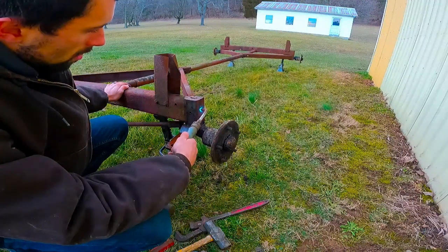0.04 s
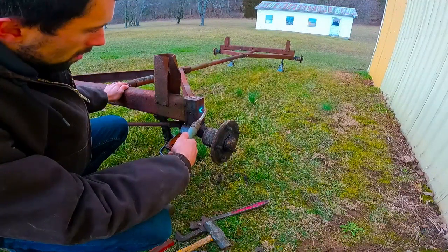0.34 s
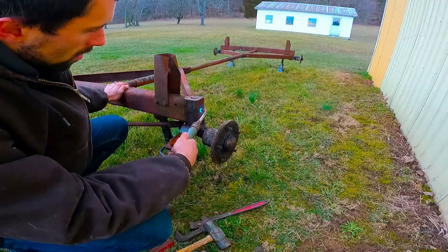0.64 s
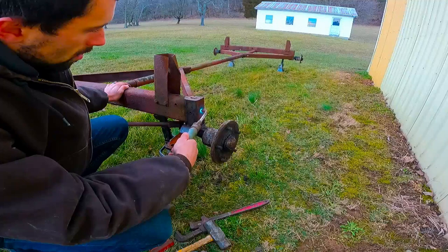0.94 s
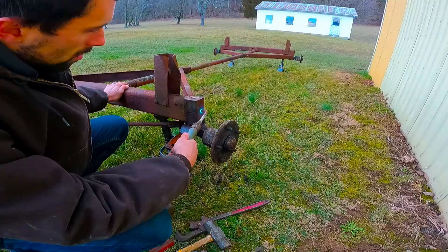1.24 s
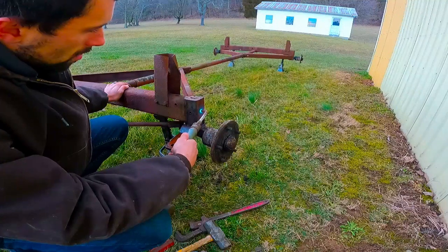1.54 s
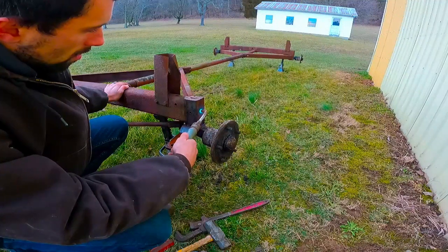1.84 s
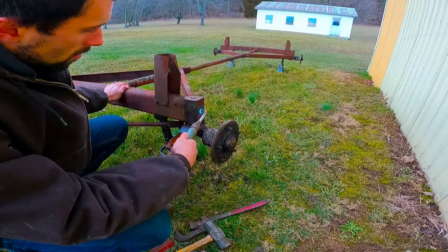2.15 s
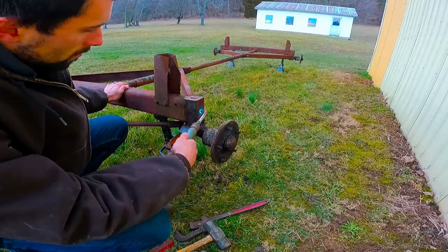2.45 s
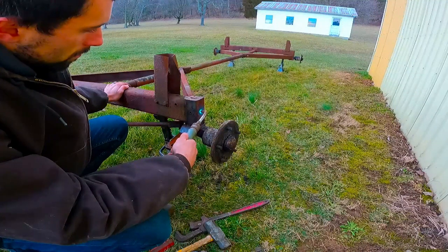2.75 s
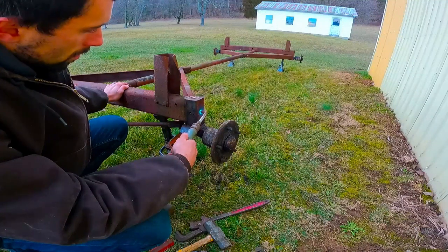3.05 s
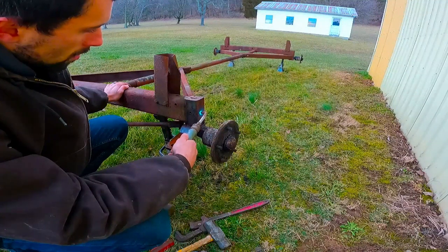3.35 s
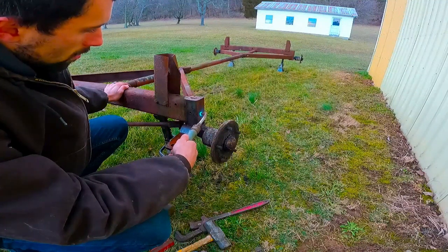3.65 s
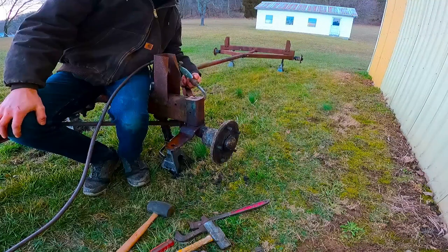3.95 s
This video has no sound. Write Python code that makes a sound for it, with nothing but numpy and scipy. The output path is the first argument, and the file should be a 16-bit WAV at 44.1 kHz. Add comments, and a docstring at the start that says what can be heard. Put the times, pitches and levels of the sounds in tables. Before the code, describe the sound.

The steady, crackling roar of a gas torch cutting steel is heard close by outdoors. The flame puffs and soft whistles swell over a faint rumble, until the sound suddenly becomes duller and hollow just before the end.

```python
"""A gas cutting torch roars against the steel frame of a wagon in a yard, about a metre away.
From the start its turbulent jet hisses and crackles, a nearby surface reflects it, and the flame
flutters where it strikes the steel, over a faint rumble and hum. Breathy whistles swell on the
steel's edge, most of them just after one second, and the flame puffs again in the second half.
Near the end the sound turns abruptly duller and hollower: the torch now works from another side."""
import sys
import numpy as np
from scipy.fft import rfft, irfft, next_fast_len
from scipy.io import wavfile
from scipy.ndimage import map_coordinates

SR = 44100
rng = np.random.default_rng(int(sys.argv[2]) if len(sys.argv) > 2 else 0)


def dump(signal):
    """Clip the signal to [-1, 1] and save it as 16-bit WAV at the path in sys.argv[1]."""
    limited = np.clip(np.atleast_2d(signal).T, -1, 1)
    pcm = np.round(limited * 32767).astype(np.int16)
    wavfile.write(sys.argv[1], SR, pcm)


N = 176400


def amp(db):
    """The decibel scale: 20 dB is a tenfold amplitude."""
    return 10 ** (np.asarray(db) / 20)


def unit(x):
    """Normalisation to an rms of 1."""
    return x / np.sqrt(np.mean(x ** 2) + 1e-20)


def along(points, hz):
    """Interpolation of (frequency_hz, value) points on a logarithmic frequency axis."""
    frequencies, values = np.transpose(points)
    return np.interp(np.log(hz + 1), np.log(frequencies + 1), values)


def curve(rows):
    """Linear interpolation of (time_s, value) rows, one value per sample."""
    return np.interp(np.arange(N) / SR, *np.transpose(rows))


def wobble(rate_hz):
    """Smooth random modulation: a spline through rate_hz Gaussian values a second."""
    return map_coordinates(rng.standard_normal(4096), [np.arange(N) * rate_hz / SR + 2], mode="wrap")


def filtered(x, response):
    """Linear filtering: the spectrum is multiplied by a complex frequency response."""
    size = 2 * next_fast_len(N // 2 + SR // 4)
    return irfft(rfft(x, size) * response(np.fft.rfftfreq(size, 1 / SR)), size)[..., :N]


def coloured(x, spectrum, bumps=()):
    """Minimum-phase filtering by a broad spectrum plus narrow peaks and dips; the result has rms 1."""
    def response(hz):
        bumps_db = sum(db / (1 + (2 * (hz - centre) / width) ** 2) for centre, width, db in bumps)
        cepstrum = irfft(np.log(amp(along(spectrum, hz) + bumps_db)))
        middle = len(cepstrum) // 2
        cepstrum[1:middle] *= 2  # folding onto positive time makes the filter causal
        cepstrum[middle + 1:] = 0
        return np.exp(rfft(cepstrum))
    return unit(filtered(x, response))


def turbulence(shocks_per_s=2600, crackle_db=4, spread=.25):
    """Turbulent gas noise: a direct row that crackles with one-sided shocks, and a scattered row."""
    smooth, scattered = rng.standard_normal((2, N))
    shocks = (rng.random(N) < shocks_per_s / SR) * np.exp(spread * rng.standard_normal(N))
    direct = smooth - amp(crackle_db) * unit(shocks - shocks.mean())
    return np.array([unit(direct), scattered])


def reflected(x, echoes, drift_ms=.0086, scatter_gain=.054):
    """Comb filtering: short echoes interfere with the sound; the frame and ground scatter its treble."""
    out = x
    for delay_ms, gain in echoes:
        drifting_ms = delay_ms + drift_ms * wobble(3)  # the hand is not quite still
        positions = np.arange(N) - drifting_ms * SR / 1000
        out = out + gain * np.array([map_coordinates(row, [positions]) for row in x])
    scatter = sum(np.roll(x, round(delay_s * SR), axis=-1) for delay_s in rng.uniform(.004, .014, 12))
    return unit(out + scatter_gain * filtered(scatter, lambda hz: hz / (hz + 1500)))


def jet(split_hz=3690, surge_db=.81, turn_s=3.768, fade_s=.005):
    """Turbulent jet noise, shaped by resonance and interference, from the front and then from behind."""
    # Envelopes of the jet's roar and of its hiss: time_s, level_db
    roar_levels = [(0.0, -22), (0.97, -22), (1.35, -22.5), (1.36, -21.5), (3.32, -21.5), (3.52, -20.5),
                   (3.95, -21.5), (4.0, -21)]
    hiss_levels = [(0, -27.5), (.2, -28), (.345, -30), (.378, -23), (.39, -32.5), (.5, -28), (.86, -30),
                   (.92, -28.5), (1.3, -29), (1.75, -29.5), (2.15, -28.5), (2.55, -30.5), (3, -28),
                   (3.4, -29.5), (3.73, -29.5), (3.755, -27.5)]
    # Spectrum of the jet from each side: frequency_hz, density_db
    front_spectrum = [(60, -43), (150, -19.5), (300, -18), (400, -15), (520, -3.5), (750, -0.2), (1000, -4),
                      (1500, 0.57), (2200, 0.5), (3400, -1), (4100, -7.5), (6100, -6.5), (7000, -14),
                      (9500, -25.8), (12000, -29), (13200, -39.5)]
    behind_spectrum = [(59, -52), (100, -34), (266, -23), (368, -29), (408, -22), (588, -9.5), (625, -7),
                       (766, -10), (849, -17), (921, -5.5), (1020, -14), (1220, -0.5), (1410, -13.5),
                       (1530, -11.5), (1880, -15), (2040, -12), (2210, -22), (2550, -15), (2880, -19),
                       (3830, -22), (5420, -26), (6120, -30.5), (6770, -32), (7810, -39.5), (13000, -55.5)]
    # Resonances of the flame and the steel around it: centre_hz, width_hz, gain_db
    resonances = [(985, 170, 12.5), (1255, 195, 9), (1840, 60, 4), (2260, 85, 4.5), (3125, 65, 4),
                  (3520, 90, 4.5), (3773, 85, 5.5), (4355, 60, 3.5), (4480, 80, 4), (5069, 60, 2),
                  (5770, 55, 3.5), (7410, 60, 3)]
    # Narrow hollows in the jet's spectrum: centre_hz, width_hz, gain_db
    notches = [(844.6, 40.5, -23), (1400, 45, -10.5), (1507, 26, -10), (2387, 30, -7.5), (2614, 21, -5),
               (3584, 68, -5.5), (4411, 27, -9), (6773, 132, -5.5)]
    # Reflections close to the torch on each side: delay_ms, gain
    front_echoes = [(3.045, .26), (5.11, .1)]
    behind_echoes = [(3.9, 0.22), (5.4, 0.12)]
    front_noise = reflected(coloured(turbulence(), front_spectrum, [*resonances, *notches]), front_echoes)
    behind_noise = reflected(coloured(turbulence(), behind_spectrum), behind_echoes)
    roar = filtered(front_noise, lambda hz: 1 / (1 + (hz / split_hz) ** 10))
    hiss = front_noise - roar
    roar_db = curve(roar_levels)
    hiss_db = curve(hiss_levels) + surge_db * wobble(45)
    front = amp(roar_db + .5) * unit(roar) + amp(hiss_db) * unit(hiss)
    behind = amp(roar_db + 1) * behind_noise
    turn = np.clip((np.arange(N) / SR - turn_s) / fade_s + .5, 0, 1)
    return np.sqrt(1 - turn) * front + np.sqrt(turn) * behind  # equal-power crossfade


def flame(flutter_hz=27, depth_db=8, unevenness=.35, puff_rise_s=.0044):
    """Amplitude modulation: the flame flaps unevenly on the steel and puffs, pulsing its low noise."""
    # Envelope of the flutter: time_s, level_db
    flutter_levels = [(0, -44), (.1, -43.5), (.35, -38), (.6, -40.5), (.9, -40), (.98, -53), (1.25, -46),
                      (1.42, -45.5), (1.6, -47.5), (2.1, -40), (2.38, -49), (2.56, -37.5), (2.8, -36),
                      (2.95, -44), (3.25, -39), (3.5, -40), (3.65, -68), (3.8, -52), (4, -41)]
    # The strongest puffs: start_s, relative_peak_db
    puffs = [(0.114, -28), (0.224, -28), (0.309, -32), (0.329, -29), (0.404, -28), (0.424, -29),
             (0.469, -31), (0.531, -28), (0.575, -27), (0.614, -27), (0.664, -28), (0.705, -28),
             (0.763, -29), (0.843, -29), (0.908, -29), (1.459, -38), (2.504, -31), (2.588, -33),
             (2.646, -29), (2.752, -28), (3.171, -29), (3.236, -31), (3.509, -31)]
    # Spectrum of the flame: frequency_hz, density_db
    spectrum = [(60, -13), (140, -6.5), (190, -10.5), (260, -2), (400, -4), (500, 4), (740, 2), (850, -17),
                (2000, -44.5)]
    flap_hz = flutter_hz * np.exp(unevenness * wobble(30))
    flaps = np.sin(2 * np.pi * np.cumsum(flap_hz) / SR)
    flap_db = depth_db * flaps - .5 * wobble(25.4)
    envelope = amp(curve(flutter_levels) - 1) * unit(amp(flap_db))
    for start_s, peak_db in puffs:
        age = np.maximum(np.arange(N) / SR - start_s, 0) / puff_rise_s
        envelope += amp(peak_db - 4.5) * age * np.exp(1 - age)
    return envelope * coloured(turbulence(), spectrum)


def yard(hum_hz=73.6, hum_db=-5, waver_db=4, drift_hz=4):
    """Ambient noise: a faint, swelling rumble and a hum modulated in frequency and amplitude."""
    # Spectrum of the outdoor rumble: frequency_hz, density_db
    spectrum = [(15, -3), (30, -6), (55, 0.5), (75, -2), (100, -0.5), (125, -6.5), (158, -3.5), (185, -17),
                (500, -34.5)]
    # Envelope shared by rumble and hum: time_s, level_db
    levels = [(0, -45), (.13, -45), (.2, -53), (.29, -44), (.55, -46), (.8, -52), (1.1, -49), (1.22, -53),
              (1.38, -45), (1.65, -53), (2.05, -50), (2.25, -55), (2.6, -51), (3.3, -52), (4, -53)]
    phase = 2 * np.pi * np.cumsum(hum_hz + drift_hz * wobble(8)) / SR
    hum = amp(hum_db) * unit(amp(waver_db * wobble(6.5)) * np.sin(phase))
    ambience = coloured(rng.standard_normal((2, N)), spectrum)
    ambience[0] += hum  # direct row only
    return amp(curve(levels)) * ambience


def whistles():
    """Edge tones: the jet on the steel's edge makes narrow bands of hiss that swell and fade."""
    # Breathy whistles as the nozzle shifts: middle_s, half_length_s, centre_hz, width_hz, level_db
    edge_tones = [(1.15, .3, 4910, 70, -41), (1.1, .35, 5280, 70, -44), (1.15, .3, 6300, 400, -39),
                  (1.15, .3, 7850, 130, -48), (.7, .8, 3310, 130, -37), (3.1, .3, 7430, 200, -48),
                  (3.9, .15, 7460, 80, -52)]
    out, t = np.zeros((2, N)), np.arange(N) / SR
    for middle_s, half_length_s, centre_hz, width_hz, level_db in edge_tones:
        noise = rng.standard_normal((2, N))
        band = unit(filtered(noise, lambda hz: 1 / (1 + (2 * (hz - centre_hz) / width_hz) ** 2)))
        swell = np.exp(-((t - middle_s) / half_length_s) ** 4)
        out += amp(level_db) * swell * band
    return out


def scene():
    """Superposition in stereo: direct sound forms the mid signal and scattered sound the side."""
    # Width of the stereo image: frequency_hz, side_gain_db
    width = [(30, -21), (100, -10), (500, -30), (1200, -20), (3000, -15.5), (5500, -16), (8000, -8),
             (12000, -7)]
    # Level of the left channel over the right: frequency_hz, balance_db
    balance = [(60, -2), (91, 2), (140, -0.5), (210, -1.5), (320, -2.5), (480, -0.5), (730, -1.0),
               (1100, -1.0), (1670, -3), (2530, -0.5), (3830, -0.5), (5800, 0.0), (8790, 1.5),
               (13300, -1.5)]
    # Phase of the left channel ahead of the right: frequency_hz, lead_rad
    lead = [(0, 0.17), (1380, -0.24), (2070, -0.35), (4130, -0.67), (5340, -0.32), (6550, -0.42),
            (7750, -0), (8870, -0.4), (9820, -0.2), (13500, 0.1)]
    direct, scattered = jet() + whistles() + flame() + yard()
    side = filtered(scattered, lambda hz: amp(along(width, hz)))
    stereo = np.array([direct + side, direct - side])
    half = np.array([[.5], [-.5]])  # each channel takes half, with opposite signs
    return filtered(stereo, lambda hz: amp(half * along(balance, hz)) * np.exp(1j * half * along(lead, hz)))


def record(dry):
    """Band limiting: an ideal low-pass filter removes everything above 13.6 kHz."""
    return filtered(dry, lambda hz: hz < 13600)


dry = scene()
out = record(dry)
dump(out)
```